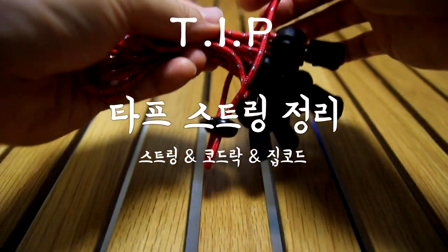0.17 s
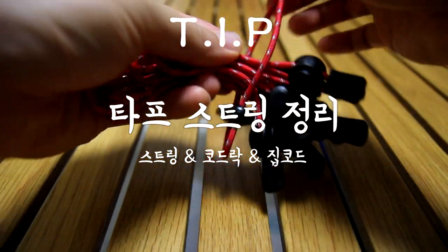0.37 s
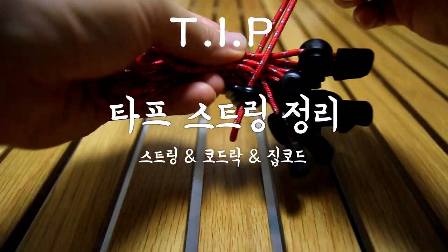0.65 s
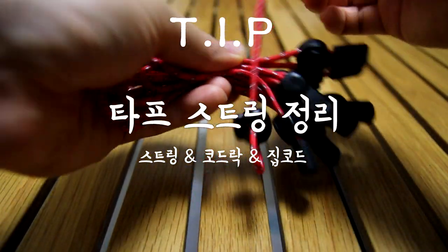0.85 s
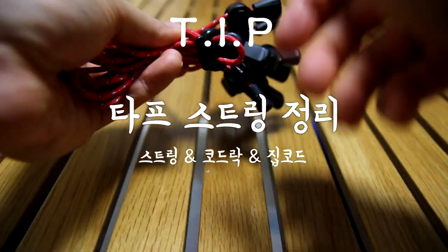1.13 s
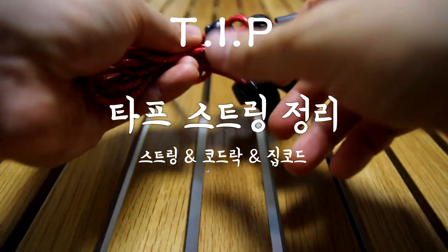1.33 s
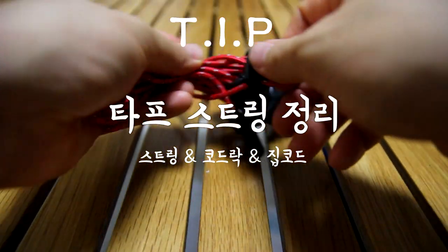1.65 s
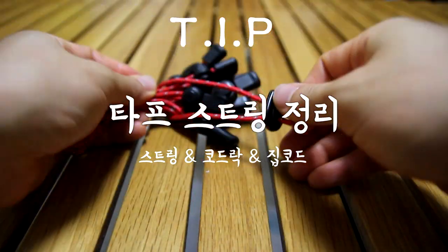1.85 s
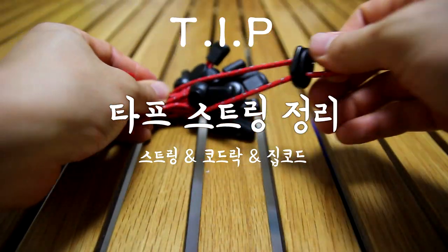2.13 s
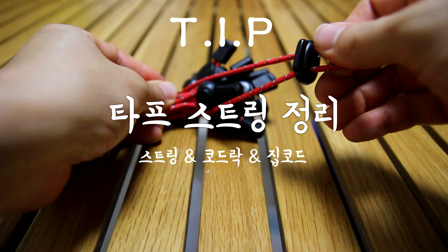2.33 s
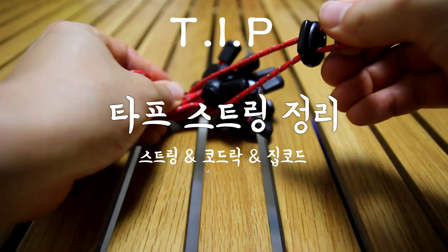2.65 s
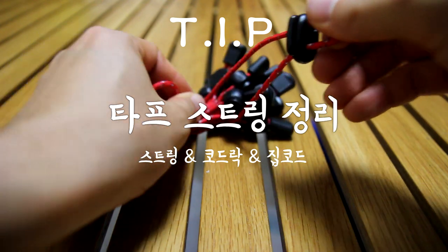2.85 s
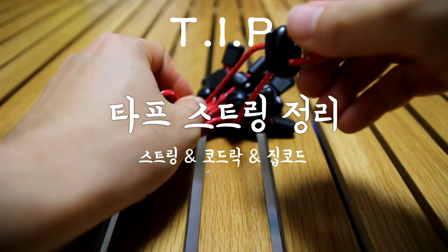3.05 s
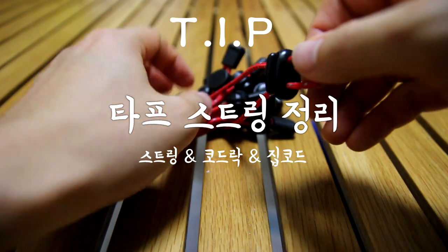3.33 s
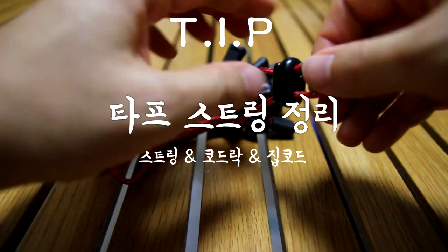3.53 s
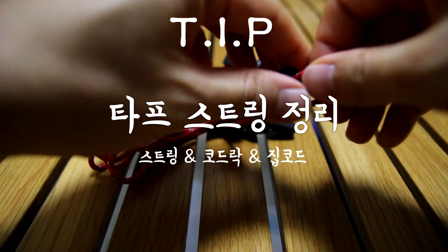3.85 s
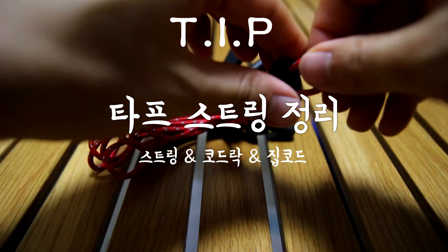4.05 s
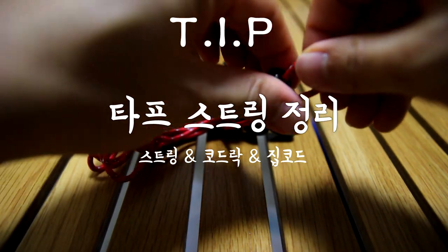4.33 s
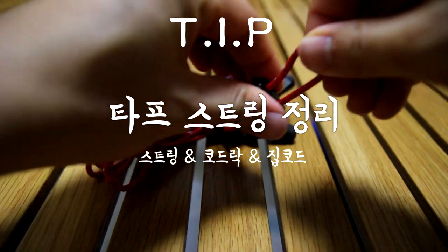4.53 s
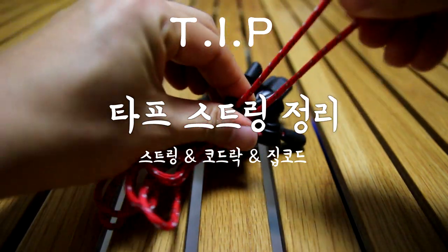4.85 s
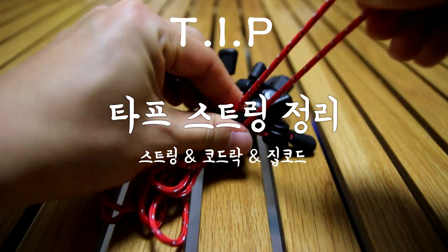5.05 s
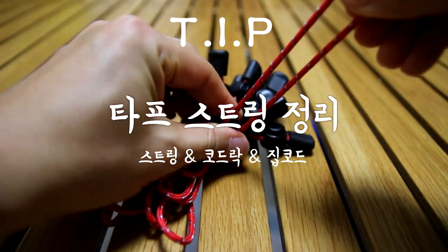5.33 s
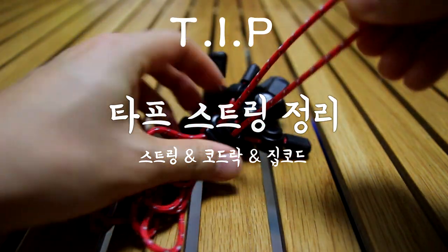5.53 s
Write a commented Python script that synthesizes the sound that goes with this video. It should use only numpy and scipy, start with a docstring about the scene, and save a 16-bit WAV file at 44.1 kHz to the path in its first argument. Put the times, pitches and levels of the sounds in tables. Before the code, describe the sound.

A close, dry, practically mono recording of hands sorting a cord bundle with small hollow plastic locks on a slatted wooden table. From 0 to 1 s there is light cord rasp, soft rubbing and small bright ticks. A clear click comes near 1.2 s, then strong plastic clacks at about 1.3 and 1.5 s. The loudest, busiest cluster runs from 1.6 to 2.2 s: sharp knocks, rattling drags and brief fibrous rasps, with short woody resonance. From 2.4 to 3.5 s the handling softens into scattered light knocks, dull bumps and faint rubbing. It is nearly quiet from 3.6 to 4.6 s, with one tiny tick around 4.4 s. A new burst of clicks and scraping starts near 4.7 s, eases after 5.2 s, and ends with a firmer knock and rub around 5.6 s. Small-room reflections, low room tone, faint deep table sway and steady hiss lie underneath.

```python
"""Plastic cord locks knock on each other and on a slatted wooden table as hands sort a bundle of cords, close up.
Knocks are noise bursts that crack and excite modes of locks and slats; drags feed random slips to the same
modes; cord rasp is coloured slips in patchy bands. A small room answers with decaying noise bands, over room
tone and a slow table sway. Both channels carry one microphone and a faint whine; each adds its own hiss."""
import sys
import numpy as np
from scipy import signal
from scipy.fft import rfft, irfft
from scipy.io import wavfile

SR = 44100
rng = np.random.default_rng(int(sys.argv[2]) if len(sys.argv) > 2 else 0)


def transcribe(u):
    """Save the signal u as a 16-bit wav file named by the first command-line argument.

    u: samples, shape (n,) or (channels, n), limited to [-1, 1]; the rate is SR.
    q: integer samples, one column per channel.
    """
    v = np.clip(np.atleast_2d(u).T, -1, 1)
    q = np.round(v * 32767).astype(np.int16)
    wavfile.write(sys.argv[1], SR, q)


N = 250488


def amp(db):
    """dB to gain."""
    return 10 ** (np.asarray(db) / 20)


def rms_one(x):
    """Scale to rms 1."""
    return x / np.sqrt(np.mean(x ** 2) + 1e-20)


def noise():
    """White noise over the whole scene, rms near 1."""
    return rng.standard_normal(N)


def bandpass(x, edges_hz, order):
    """Butterworth band-pass."""
    return signal.sosfilt(signal.butter(order, edges_hz, "band", fs=SR, output="sos"), x)


def lowpass(x, cutoff_hz, order):
    """Butterworth low-pass."""
    return signal.sosfilt(signal.butter(order, cutoff_hz, fs=SR, output="sos"), x)


def at_hz(points, hz):
    """Interpolate the second column on a log-frequency axis."""
    points_hz, values = np.array(points).T
    return np.interp(np.log(hz), np.log(points_hz), values)


def colour(x, spectrum):
    """Give a steady texture a spectrum; rms 1."""
    hz = np.maximum(np.arange(N // 2 + 1) * SR / N, 1)
    return rms_one(irfft(rfft(x) * amp(at_hz(spectrum, hz)), N))


def ring(force, hz, t60_s):
    """Damped resonator: a unit click sets a sine of initial height 1 ringing."""
    r, w = np.exp(-np.log(1000) / (t60_s * SR)), 2 * np.pi * hz / SR
    return signal.lfilter([0, np.sin(w)], [1, -2 * r * np.cos(w), r * r], force + 1e-18)


BURST_LEN = 500   # samples
CRACK_DB, CRACK_TOP_DB = -5, -16   # re knock reference; top band re bright band
CRACK_DECAY_S, CRACK_RISE_S = 0.00093, 0.00025   # before the shortening of bright knocks
SHORTER_DB_PER_DB = 0.8   # bright knocks have shorter contacts
PUSH_S = 0.0055   # slower force on the low slat modes
UPPER_RING_DB, UPPER_DB_PER_BRIGHT_DB = -4.5, -0.36
LOCK_RING_DB, LOCK_DB_PER_BRIGHT_DB = -8.5, -0.6
MODE_SCATTER_DB, COLOUR_PIVOT_HZ = 2.5, 2300

# Low modes of the slats. Each row: frequency in Hz, relative level in dB, undamped t60 in s.
SLAT_LOW_MODES = [(197, -6, .3), (385, 0, .18), (414, -5, .18), (443, -4, .16), (530, -8, .13)]
# Upper modes of the slats. Each row: frequency in Hz, relative level in dB, undamped t60 in s.
SLAT_UPPER_MODES = [(805, -3.5, 0.062), (1218, -3, 0.023), (1572, 0, 0.025), (2019, 2.5, 0.026),
                    (2815, 1, 0.016), (2918, -0.5, 0.031), (3606, 8, 0.012), (4503, 9, 0.0092)]
# Short, broad modes of the hollow plastic locks. Each row: frequency in Hz, relative level in dB, t60 in s.
LOCK_MODES = [(980, -2, .025), (1380, -2, .02), (1680, -1, .02), (2200, -1, .018), (2500, -1, .018),
              (3250, 0, .015), (3900, 1, .009), (4350, 2, .008), (5000, 1, .007), (5600, 0, .006),
              (6300, -2, .006), (7000, -6, .005)]
# Knocks. Each row: start in seconds, reference level in dB, dull part in dB re the 1.5-3.6 kHz part,
# bright part in dB re the same, weight on the slats in dB re reference, lowest slat mode over the others in dB.
KNOCKS = [(0.051, -45, -15, -9, -7, -5), (0.267, -36.5, -24, 20, -32, 0), (0.3137, -26.5, 1, -8, -7, 27),
          (0.5574, -43.5, -3, 14, -8, 22), (0.612, -40.5, -15, 26.5, -34, 12),
          (0.6265, -39.5, -24, 19, -23, 8), (0.9028, -37, -21, 21.5, -32, 10),
          (0.972, -38, -50, -15, -41, -2), (1.164, -22, -8, 16.5, -33, 19), (1.187, -46, -20, 10.5, -26, 4),
          (1.309, -59, -10, 10, -30, 6), (1.336, -9, -15, -1, -26, -5.5),
          (1.4808, -13, -20, -19, -23.5, 23), (1.5802, -26.5, -23, -28, -27, -2),
          (1.6721, -17.5, -17.5, -21.5, -26, 8), (1.715, -27.5, -39, -31, -37, 1),
          (1.733, -8.5, -33, -18, -39, -4), (1.8084, -7, -22.5, -11, -41, -16),
          (1.83, -29, -11, -4, -24, -1), (1.8666, -15, -3.5, -0.5, -10.5, -15),
          (1.8844, -25, -33, 3, -10.5, 5), (1.9782, -39.5, 0, -23, -23, -9),
          (2.0619, -21.5, -50, -11.5, -20, 8), (2.1423, -17, -58, -22, -27.5, -4),
          (2.1871, -30.5, -26, -22, -27, 11), (2.2211, -16.5, -4.5, 0, -16, 9),
          (2.4536, -37, -14.5, -13, -26, 3), (2.5243, -43, 4, 11, -4.5, 0),
          (2.6048, -59.5, 13.5, -21, -6, -4.5), (2.6737, -30, -19.5, -15.5, -21.5, -12),
          (2.7793, -35, -35, -33, -28, 1), (2.8628, -29, -8, -21, -24, -13),
          (2.9049, -41.5, -31, -43, -10, 2), (2.944, -40, -3, -9, -13, -5), (3.039, -43.5, -9, 2, 0.5, 4.5),
          (3.0805, -41.5, -2, -11, 3, 7), (3.1494, -43, 7, -8, -5, -1), (3.3521, -44, 6, -17, 1, -22),
          (3.48, -51.5, -5.5, -21, 7.5, 24), (4.3588, -47.5, -16, 24.5, -28, 4),
          (4.749, -21.5, -16, 9.5, -12.5, -2), (4.817, -24.5, -22, -14, -42, -4),
          (4.8409, -32.5, -8, -19, -28, -17), (4.8647, -29.5, -47, -21, -11, 9),
          (4.8988, -33.5, -26, -16, -23, 1), (4.92, -29.5, -27, -11, -27, -14),
          (4.9466, -27.5, -36, -31, -22, -9), (4.9857, -29, -2, 13, -22, -8),
          (5.0064, -38.5, -3, -33, -3.5, 14), (5.0868, -48, -9, 0, -9, 10),
          (5.1287, -42, -15, -43, -26, -4), (5.1664, -21, -14, -12, -16, 6.5),
          (5.2154, -25.5, -19, -30, -16.5, -4), (5.2196, -18.5, -14, -10, -22, 2),
          (5.3688, -48, -14, -29, 4, 33), (5.435, -48, -37, 11, -12, 8), (5.468, -49, -12, 12, -14, -5),
          (5.5034, -46.5, -13, -18, -2, -16), (5.6023, -16.5, -9, -16, -17, -20),
          (5.616, -30, -27, -22, -20, -11)]


def knocks():
    """Each knock is a burst of tiny contacts: it cracks, rings locks and slats by its colour, and thuds."""
    start_s, level_db, dull_db, bright_db, weight_db, lowest_db = np.transpose(KNOCKS)
    boom_db = weight_db + np.minimum(lowest_db, 0)
    thud_db = weight_db - np.maximum(lowest_db, 0)
    snap_db = np.maximum(bright_db, 0)
    upper_db = UPPER_RING_DB + UPPER_DB_PER_BRIGHT_DB * bright_db
    locks_db = LOCK_RING_DB + LOCK_DB_PER_BRIGHT_DB * snap_db

    t = np.arange(BURST_LEN) / SR
    starts = np.round(start_s * SR).astype(int)
    at = np.clip(starts[:, None] + np.arange(BURST_LEN), 0, N - 1)
    contacts = rng.standard_normal((len(start_s), BURST_LEN))
    quicker = amp(SHORTER_DB_PER_DB * snap_db)[:, None]
    burst = contacts * np.exp(-quicker * t / CRACK_DECAY_S) * (1 - np.exp(-quicker * t / CRACK_RISE_S))
    push = contacts * t * np.exp(-t / PUSH_S)

    out = np.zeros(N)
    for edges_hz, part_db in [((750, 1500), dull_db), ((1500, 3600), 0), ((3500, 6300), bright_db),
                              ((7000, 15000), bright_db + CRACK_TOP_DB)]:
        crack = bandpass(burst, edges_hz, order=3)
        crack *= (amp(level_db + part_db + CRACK_DB) / np.abs(crack).max(axis=1))[:, None]
        np.add.at(out, at, crack)

    def ring_mode(mode, share_db, source):
        """The burst's energy near a mode sets it ringing at a set strength."""
        hz, mode_db, t60_s = mode
        scatter_db = MODE_SCATTER_DB * rng.standard_normal(len(start_s))
        strength = amp(level_db + share_db + mode_db + scatter_db)
        near = signal.lfilter(*signal.butter(1, [hz / 1.3, hz * 1.3], "band", fs=SR), source)
        drive = np.abs(near @ np.exp(-2j * np.pi * hz * t))   # how hard each burst drives this mode
        drive = np.maximum(drive, 0.5 * np.median(drive))
        force = np.zeros(N)
        np.add.at(force, at, near * (strength / drive)[:, None])
        return ring(force, hz, t60_s)

    def colour_db(hz, treble_db):
        """Dull part below the pivot, treble above, each fading in over an octave."""
        octaves = np.log2(hz / COLOUR_PIVOT_HZ)
        return np.clip(-octaves, 0, 1) * dull_db + np.clip(octaves, 0, 1) * treble_db

    for mode in SLAT_UPPER_MODES:
        out += ring_mode(mode, colour_db(mode[0], np.minimum(bright_db, 0)) + upper_db, burst)
    for mode in LOCK_MODES:
        out += ring_mode(mode, colour_db(mode[0], bright_db) + locks_db, burst)
    for mode in SLAT_LOW_MODES:
        out += ring_mode(mode, boom_db if mode[0] < 300 else thud_db, push)
    return out


DRAG_TOP_HZ, RATTLE_DB = 3100, -4.5   # soft contact: few highs; rattle re slat drag


def rubbing():
    """Locks drag on the wood, jostle each other and shake the slats; the cord rasps through the plastic."""
    drag_gain, shake_gain, rasp_gain = strokes()
    drag = dragged(SLAT_UPPER_MODES, per_s=5000, spread_db=2.8, damping=0.72)
    drag += amp(RATTLE_DB) * dragged(LOCK_MODES, per_s=2500, spread_db=3.8, damping=1)
    drag = lowpass(drag, DRAG_TOP_HZ, order=3)
    shake = dragged(SLAT_LOW_MODES, per_s=1100, spread_db=5.0, damping=0.88)
    grip = lumps(cutoff_hz=110, depth_db=3.0)
    return grip * (drag_gain * drag + rasp_gain * rasp(patchy_db=1.5)) + shake_gain * shake


# Rubbing strokes. Each row: height in seconds, rise over 20 dB in s, fall over 20 dB in s,
# drag gain in dB, slat shake gain in dB, rasp gain in dB.
STROKES = [(0.1, 0.21, 0.67, -60.5, -66, -45), (0.36, 0.12, 0.22, -47.5, -69, -48.5),
           (0.445, .12, 0.033, -41, -68, -47), (0.608, 0.11, 0.029, -48, -59, -44.5),
           (0.849, 0.025, 0.043, -55.5, -83, -44), (0.94, 0.12, 0.14, -53.5, -87, -42.5),
           (1.6, 0.077, 0.27, -45, -56, -59), (1.695, 0.048, 0.066, -36, -47.5, -48),
           (1.781, 0.073, 0.19, -30.5, -43.5, -39), (1.84, 0.027, 0.01, -38, -58, -49),
           (1.87, 0.02, 0.076, -37.5, -38, -30.5), (2.12, 0.096, 0.057, -32.5, -55, -36),
           (2.212, 0.029, .09, -36.5, -50, -44), (2.463, 0.037, 0.043, -42.5, -52.5, -45.5),
           (2.51, 0.076, 0.058, -45, -48.5, -56), (2.794, 0.11, 0.09, -45, -52, -51),
           (2.87, 0.11, 0.13, -44.5, -56, -49.5), (3.1, 0.24, 0.43, -68, -67, -53.5),
           (3.258, 0.5, 0.14, -50.5, -52, -58), (3.53, 0.13, 0.14, -83, -58, -75.5),
           (4.6, 0.1, 0.082, -66, -52, -54), (4.678, .11, 0.24, -37, -38, -42),
           (4.756, 0.3, 0.1, -34.5, -61, -46), (4.87, 0.11, 0.19, -45, -72, -50),
           (4.957, 0.036, 0.069, -32.5, -48, -33), (5.13, 0.05, 0.031, -48, -66, -49),
           (5.26, 0.31, 0.33, -55, -56.5, -51.5), (5.553, 0.056, 0.069, -33, -53, -40.5),
           (5.629, 0.091, 0.031, -36, -33.5, -69)]


def strokes():
    """Each stroke swells to its height and fades; overlapping strokes add in power."""
    t, power = np.arange(N) / SR, np.zeros((3, N))
    for height_s, rise_s, fall_s, *levels_db in STROKES:
        down_20db = np.where(t < height_s, (height_s - t) / rise_s, (t - height_s) / fall_s)
        power += (amp(levels_db)[:, None] * amp(-20 * down_20db)) ** 2
    return np.sqrt(power)


def grains(per_s, spread_db):
    """Random slips of uneven size and sign."""
    size_db = spread_db * np.minimum(rng.exponential(1, N), 4)
    sizes = amp(size_db) * rng.choice([-1, 1], N)
    return sizes * (rng.random(N) < per_s / SR)


def dragged(modes, per_s, spread_db, damping):
    """Slips dealt at random to four groups of modes, with t60 scaled by damping; rms 1."""
    slips, group = grains(per_s, spread_db), rng.integers(0, 4, N)
    total = np.zeros(N)
    for k, (hz, db, t60_s) in enumerate(modes):
        total += amp(db) * ring(slips * (group == k % 4), hz, t60_s * damping)
    return rms_one(total)


def lumps(cutoff_hz, depth_db):
    """Uneven grip or cover: a gain that wanders in dB as low-passed noise, depth in rms."""
    return amp(depth_db * rms_one(lowpass(noise(), cutoff_hz, order=2)))


# Spectrum of the cord fibres. Each row: frequency in Hz, relative density in dB per Hz.
RASP_SPECTRUM = [(1500, -45), (2500, -2), (3300, -5), (4300, -4.5), (6000, -3.5), (7000, -9.5), (7900, -11),
                 (11000, -20), (15500, -28.5)]


def rasp(patchy_db):
    """Cord fibres catch on the plastic; each band swells on its own as fingers cover and bare the cord."""
    fibres = colour(grains(per_s=6000, spread_db=3.0), RASP_SPECTRUM)
    edges_hz = [1200, 2800, 4200, 5400, 7800, 16000]
    total = np.zeros(N)
    for band_hz in zip(edges_hz, edges_hz[1:]):
        total += lumps(cutoff_hz=8.1, depth_db=patchy_db) * bandpass(fibres, band_hz, order=2)
    return total


ROOM_DB = -12.5
# Decay of the room. Each row: frequency in Hz, t60 in s.
ROOM_DECAY = [(200, 0.52), (1000, 0.29), (4000, 0.16), (7000, 0.33), (12000, 0.034)]


def room(x):
    """Dense reflections: octave bands of noise, each dying at its own rate, starting after the nearest wall."""
    t = np.arange(SR // 3) / SR
    tail = np.zeros(len(t))
    for low_hz in 100 * 2.0 ** np.arange(7):
        band = bandpass(rng.standard_normal(len(t)), [low_hz, 2 * low_hz], order=2)
        tail += band * np.exp(-np.log(1000) * t / at_hz(ROOM_DECAY, low_hz * np.sqrt(2)))
    tail *= np.clip((t - 0.003) / 0.0027, 0, 1)
    return signal.fftconvolve(x, tail / np.sqrt(np.sum(tail ** 2)))[:N]


ROOM_TONE_DB = -56   # rms
# Spectrum of the room tone. Each row: frequency in Hz, relative density in dB per Hz.
ROOM_TONE_SPECTRUM = [(20, -17), (33, -16.5), (43, 2), (100, -5), (200, -5), (450, -10.5), (900, -14.5),
                      (2000, -19), (6000, -24), (16000, -26.5)]
# Leans of a hand that sway the table. Each row: centre in seconds, length in s, level in dB.
SWAYS = [(2.28, 0.45, -54), (2.9, 0.5, -60), (3.42, 0.4, -59), (5.5, 0.7, -59)]


def background():
    """Steady coloured-noise room tone, and table sway as 19-23 Hz noise under Gaussian swells."""
    t = np.arange(N) / SR
    tone = colour(noise(), ROOM_TONE_SPECTRUM)
    sway = rms_one(bandpass(noise(), [19, 23], order=3))
    lean = np.zeros(N)
    for centre_s, length_s, db in SWAYS:
        lean += amp(db) * np.exp(-2 * ((t - centre_s) / (length_s / 2)) ** 2)
    return amp(ROOM_TONE_DB) * tone + lean * sway


def scene():
    """One microphone feeds both channels."""
    hands = knocks() + rubbing()
    return np.tile(hands + amp(ROOM_DB) * room(hands) + background(), (2, 1))


HISS_DB, CUTOFF_HZ = -59.5, 15800   # hiss rms before the cut
WHINE_HZ, WHINE_DB = 15734, -83.5   # line-scan whine of the electronics, rms


def record(dry):
    """Each channel adds its own white hiss and a common faint whine; a steep low-pass cuts the top."""
    whine = amp(WHINE_DB) * np.sqrt(2) * np.sin(2 * np.pi * WHINE_HZ * np.arange(N) / SR)
    hiss = amp(HISS_DB) * rng.standard_normal(dry.shape)
    wet = np.clip(dry + hiss + whine, -1, 1)
    return signal.sosfilt(signal.ellip(12, 0.5, 60, CUTOFF_HZ, fs=SR, output="sos"), wet)


dry = scene()
out = record(dry)
transcribe(out)
```